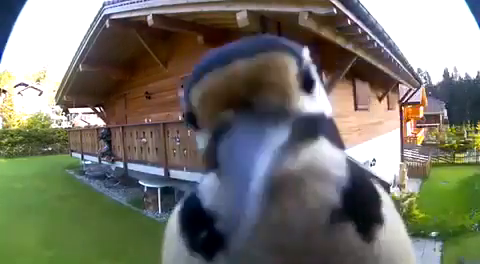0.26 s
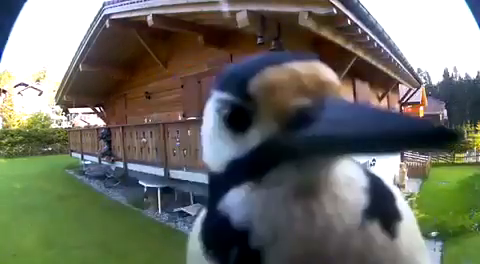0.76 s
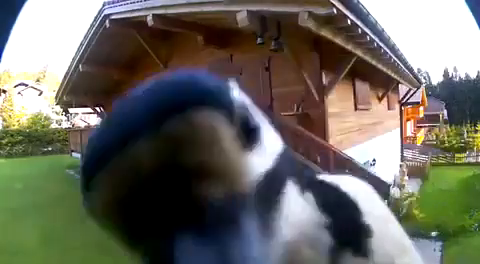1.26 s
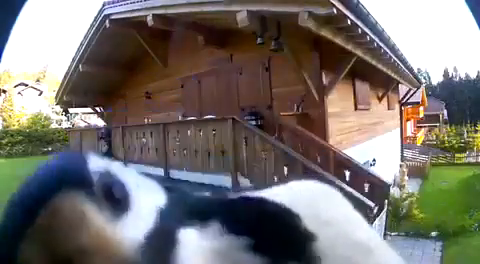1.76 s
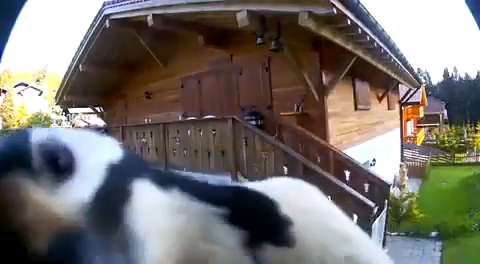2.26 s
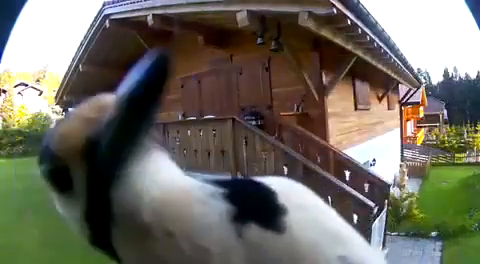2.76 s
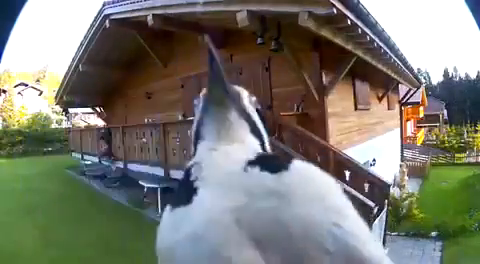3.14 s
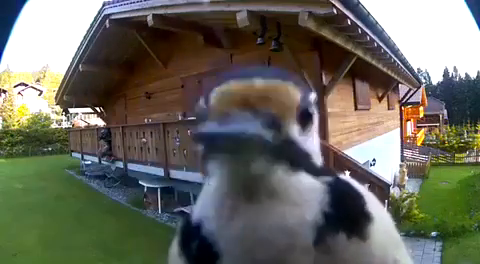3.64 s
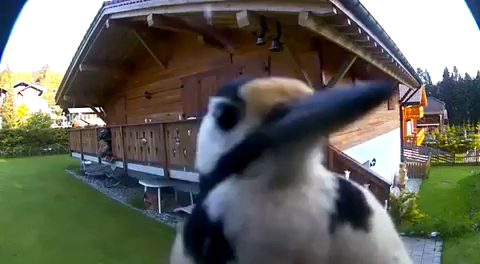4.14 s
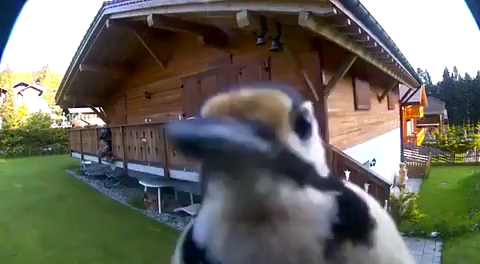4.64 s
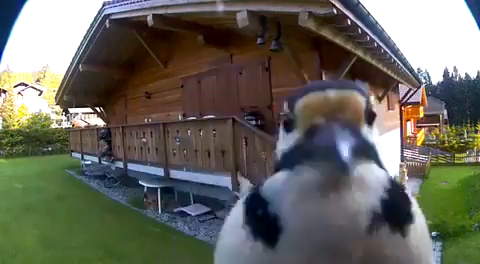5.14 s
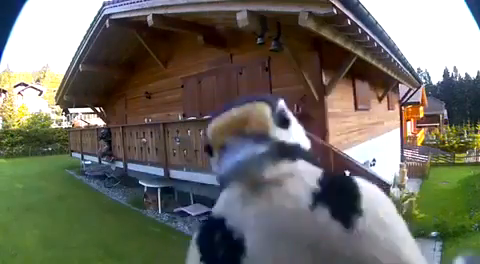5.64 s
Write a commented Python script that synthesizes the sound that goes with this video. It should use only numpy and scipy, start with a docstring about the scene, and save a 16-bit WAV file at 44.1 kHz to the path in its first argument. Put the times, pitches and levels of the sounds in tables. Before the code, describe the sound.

A woodpecker pecks on a small plastic camera with the microphone inside, over the faint low hush of a garden. Soft foot bumps and a light tap open the sound. Sharp, hard pecks land at about 0.5, 0.7 and 1.1 seconds, the third loudest, overloading the microphone and leaving a faint ring. From 1.4 to 2.5 seconds the bill taps lightly, scrapes and gives tiny squeaks. Far off, a small bird repeats a very faint rising note around 1.6 to 2 seconds, and a few thin whistles follow. Hard pecks return at 3.0 and 3.6 seconds, then faint dry ticks, two duller knocks at 4.6 and 4.9, and a soft foot bump. Three quick, heavy pecks come between 5.5 and 5.8 seconds. A very short buzz trails the blows near 0.5, 2.5, 3.1 and 5.8 seconds.

```python
"""A quiet garden, with the microphone inside a small camera on which a woodpecker hammers.
Small birds whistle far off over a low hush. Right at the microphone the bill taps, bounces, scrapes
and squeaks on the plastic housing, setting its modes ringing. Hard pecks come straight through the
shell and overload the input; after them the mount rings on faintly, and a short buzz may hang on."""
import sys
import numpy as np
from scipy import signal
from scipy.fft import rfft, irfft
from scipy.io import wavfile

SR = 44100
rng = np.random.default_rng(int(sys.argv[2]) if len(sys.argv) > 2 else 0)


def put_to_file(sound):
    """Save the sound as 16-bit audio at rate SR, in the file named by the first command-line argument."""
    columns = np.atleast_2d(sound).T  # one column per channel
    safe = np.clip(columns, -1, 1)
    whole_steps = np.round(safe * 32767)
    wavfile.write(sys.argv[1], SR, whole_steps.astype(np.int16))


N = 260190


def from_db(db):
    """Decibels to gain."""
    return 10 ** (np.asarray(db) / 20)


def seconds(length):
    """Time axis of a sound of this length."""
    return np.arange(int(length * SR)) / SR


def add(track, s, sound):
    """Mix a sound into the track at time s."""
    start = int(round(s * SR))
    track[start:start + len(sound)] += sound[:N - start]


def at_hz(points, hz):
    """Read a spectrum of (frequency [Hz], level [dB]) points on a log-frequency axis."""
    known_hz, db = np.transpose(points)
    return np.interp(np.log(np.maximum(hz, 1)), np.log(known_hz), db)


def noise(spectrum, size):
    """Noise with this spectrum; a flat 0 dB gives rms 1."""
    hz = np.fft.rfftfreq(size, 1 / SR)
    return irfft(rfft(rng.standard_normal(size)) * from_db(at_hz(spectrum, hz)), size)


def rms_one(x):
    """Scale to rms 1."""
    return x / np.sqrt(np.mean(x ** 2) + 1e-20)


def fade(t, t60):
    """Exponential decay, 60 dB down at t60."""
    return np.exp(-np.log(1000) * t / t60)


def mode(t, hz, t60):
    """A struck mode: a decaying sine."""
    return np.sin(2 * np.pi * hz * t) * fade(t, t60)


def whistle(pitch_hz):
    """A note that swells and fades as it follows a pitch curve."""
    return np.hanning(len(pitch_hz)) * np.sin(2 * np.pi * np.cumsum(pitch_hz) / SR)


def bursts(rows, fall_db, edge):
    """Envelope of soft-edged bursts (time [s], length [s], level [dB]), each sinking by fall_db."""
    envelope = np.zeros(N)
    for s, length, db in rows:
        size = int(length * SR)
        sinking = from_db(db - fall_db * np.linspace(-.5, .5, size))
        add(envelope, s, signal.windows.tukey(size, edge) * sinking)
    return envelope


# spectrum of the garden ambience: (frequency [Hz], relative level [dB])
HUSH_COLOUR = [(12, -45), (20, -7.5), (156, -3.5), (195, -13), (233, -7.5), (316, -15), (359, -27),
               (397, -14.5), (439, -28), (693, -21), (870, -29.5), (2590, -31.5), (3170, -32), (7300, -34),
               (8500, -45), (11000, -76), (18700, -120)]
# its level at the microphone: (time [s], level [dB])
HUSH_LEVEL = [(0, -55.5), (.9, -58), (3.3, -57.5), (4.2, -61), (5.1, -58.5), (5.9, -53.5)]

def garden_hush():
    """A low hush all around the microphone, drifting slowly in level."""
    level_db = np.interp(np.arange(N) / SR, *np.transpose(HUSH_LEVEL))
    return rms_one(noise(HUSH_COLOUR, size=N)) * from_db(level_db)


def twitter(count=170, db=-77.0, low_hz=2100, high_hz=4600):
    """The most distant birds blur into a faint haze of short sliding notes."""
    out, t = np.zeros(N), seconds(.05)
    for when, height, slide in rng.random((count, 3)):
        start_hz = low_hz * (high_hz / low_hz) ** height
        glide = 1 + 7 * (slide - .5) * t
        add(out, when * N / SR, from_db(db) * whistle(start_hz * glide))
    return out


# single whistles, far off: (time [s], length [s], start pitch [Hz], end pitch [Hz], level [dB])
FAR_WHISTLES = [(2.02, 0.06, 4500, 4840, -65.5), (2.844, .05, 3280, 3100, -69.5),
                (2.955, 0.039, 3030, 3290, -66.5), (3.229, 0.16, 2460, 1960, -68)]

def far_birds(count=5, song_start_s=1.60, step_s=.072, note_s=.042, rise_hz=(2960, 3450), note_db=-66):
    """Far from the microphone one bird repeats a rising note; a few single thin whistles follow."""
    out = np.zeros(N)
    song = [(song_start_s + k * step_s, note_s, *rise_hz, note_db) for k in range(count)]
    for s, length, start_hz, end_hz, db in song + FAR_WHISTLES:
        pitch = np.linspace(start_hz, end_hz, int(length * SR))
        add(out, s, from_db(db) * whistle(pitch))
    return out


# feet on the camera, close to the microphone: (time [s], length [s], level [dB])
FOOT_BUMPS = [(.055, 0.027, -52.5), (.14, 0.13, -56), (.325, 0.023, -42.5), (.590, 0.011, -46.5),
              (1.066, .010, -49), (3.27, 0.019, -60.5), (3.47, 0.044, -60.5), (4.999, 0.016, -41)]
# their dull spectrum: (frequency [Hz], relative level [dB])
FOOT_COLOUR = [(40, -9.5), (150, 10.5), (380, 10.5), (850, 5), (1500, -24.5), (7000, -26.5)]

def feet():
    """Soft bumps as the woodpecker shifts its feet."""
    return rms_one(noise(FOOT_COLOUR, size=N)) * bursts(FOOT_BUMPS, fall_db=11.0, edge=0.073)


# a short, close buzz after some blows: (time [s], level [dB])
BUZZES = [(.495, -39), (0.754, -59), (2.482, -43.5), (3.058, -44), (5.807, -41.5)]
# its spectrum: (frequency [Hz], relative level [dB])
BUZZ_COLOUR = [(300, -7), (900, -9), (1500, -4), (2300, 2), (3000, -4), (5500, -7), (8000, -11)]

def buzz(rate_hz=172, length_s=.074, hiss_gain=.7):
    """One rough grain repeats quickly, blurred by loose hiss."""
    grains = np.resize(noise(BUZZ_COLOUR, size=int(SR / rate_hz)), N)
    hiss = noise(BUZZ_COLOUR, size=N)
    rough = rms_one(rms_one(grains) + hiss_gain * rms_one(hiss))
    return rough * bursts([(s, length_s, db) for s, db in BUZZES], fall_db=14.5, edge=0.1)


# faint dry ticks, close by: (time [s], level before the band-pass [dB])
DRY_TICKS = [(0.632, -32), (3.779, -28), (3.869, -34), (4.373, -37.5), (4.666, -38.5), (4.727, -34.5),
             (5.001, -33.5), (5.773, -25.5)]

def ticks(band_hz=(1000, 3000)):
    """Bare clicks, too light to set the housing ringing."""
    clicks = np.zeros(N)
    for s, db in DRY_TICKS:
        add(clicks, s, from_db([db, db]))
    return signal.sosfilt(signal.butter(1, band_hz, "band", fs=SR, output="sos"), clicks + 1e-18)


# the bill tip squeaks on the shell: (time [s], length [s], pitch [Hz], rms level [dB])
BILL_SQUEAKS = [(1.414, 0.008, 2450, -33), (1.477, 0.01, 1784, -36.5), (1.483, .009, 3580, -41),
                (1.563, 0.016, 3515, -32.5), (1.561, 0.0105, 1670, -41.5), (2.325, 0.0063, 5660, -37),
                (2.333, 0.0062, 4320, -37), (2.405, .008, 5020, -29), (3.069, .011, 3500, -35)]

def squeaks():
    """Stick and slip of the sliding tip hold one shell mode in vibration for a moment."""
    out = np.zeros(N)
    for s, length, hz, db in BILL_SQUEAKS:
        tone = np.sqrt(2) * np.sin(2 * np.pi * hz * seconds(length))
        add(out, s, from_db(db) * tone * signal.windows.tukey(len(tone), .5))
    return out


BODY_TOP_HZ = 900   # body modes lie below, shell modes above
BANDS_HZ = (400, 1750, 2300, 5000)   # thud, knock, ring and snap of a blow
# modes of the housing around the microphone, and last the brief click of the bill tip:
# (frequency [Hz], relative level [dB], t60 [s])
HOUSING_MODES = [(178, -24, .12), (212.5, -17.5, 0.1), (308.5, -17.5, 0.066), (366.6, -0.5, 0.047),
                 (433, -11, 0.043), (802, -6, 0.024), (1135, -2.5, 0.0069), (1224, -7, 0.016),
                 (1752.4, -4, 0.026), (2107, 1.5, 0.0063), (2301, 0, 0.016), (2450, -9, .018),
                 (2794, -5.5, 0.0072), (3523, -2, 0.01), (4560, -9, 0.012), (4654, -8.5, .013),
                 (5783, -11, 0.013), (7650, -11, 0.0063), (5500, 3.5, 0.0041)]

def contact(levels_db, body_pitch, crack_db=-2.5, crack_t60=0.024, scatter_db=4, detune=.007):
    """The bill cracks on the housing and sets it ringing; where it lands decides the four band levels."""
    t = seconds(.2)
    colour = list(zip(BANDS_HZ, levels_db))
    blow = from_db(crack_db) * noise(colour, size=len(t)) * fade(t, crack_t60)
    for k, (hz, db, t60) in enumerate(HOUSING_MODES):
        strength = from_db(at_hz(colour, hz) + db + scatter_db * rng.standard_normal())
        # body modes all move inward with the blow and shift with its load; shell modes alternate in sign
        sign, pitch = (-1, hz * body_pitch) if hz < BODY_TOP_HZ else ((-1) ** k, hz)
        pitch *= 1 + detune * rng.standard_normal()   # the pressing bill shifts each mode
        blow += sign * strength * mode(t, pitch, t60)
    return blow


# light taps, right at the microphone: the bill chatters and slides along the shell
# (time [s], length [s], thud [dB], ring [dB], snap [dB], first-to-last swell [dB], scrape [dB])
LIGHT_TAPS = [(0.1778, 0.0052, -65, -57, -55, 0, -54), (0.1928, 0.014, -38, -35.5, -39, 22, -47.5),
              (0.329, .012, -49, -53.5, -56, -23.5, -74), (0.4757, 0.003, -22.5, -23.5, -45, -14, -43),
              (1.4097, 0.015, -59, -28.5, -40, 15, -50.5), (1.467, 0.018, -46.5, -44.5, -42, 10, -45.5),
              (1.544, .024, -45.5, -38, -43.5, 20.5, -43), (1.924, 0.04, -50.5, -50.5, -62.5, -6, -62.5),
              (1.996, 0.0089, -37.5, -46, -48, -1.5, -59), (2.269, .02, -59.5, -54.5, -53, -26, -72),
              (2.3219, 0.011, -54, -37, -38.5, 18, -50.5), (2.4019, 0.0075, -30.5, -25.5, -28, -12.5, -39),
              (2.4646, 0.015, -27, -19, -20.5, -2.5, -28)]

def taps(touches=3, brighten_db=5.5, knock_vs_ring_db=-4, body_pitch=.92):
    """Each tap is a run of touches that swells or dies, brightening as the bill lifts onto its tip."""
    out = np.zeros(N)
    for s, length, thud, ring, snap, swell_db, _ in LIGHT_TAPS:
        for along in np.linspace(0, 1, touches):
            tilt_db = brighten_db * (along - .5)
            touch = contact((thud - tilt_db, ring + knock_vs_ring_db, ring, snap + tilt_db), body_pitch)
            add(out, s + along * length, from_db(swell_db * (along - .5)) * touch)
    return out


def scrapes(slips_per_s=2500, hiss_gain=.3, lead_s=0.002, trail_s=.012):
    """From just before each tap to just after, dense tiny slips of the bill excite the shell modes."""
    slips = (rng.random(N) < slips_per_s / SR) * rng.standard_normal(N)
    t = seconds(.05)
    shell = sum((-1) ** k * from_db(db) * mode(t, hz, t60)
                for k, (hz, db, t60) in enumerate(HOUSING_MODES) if hz > BODY_TOP_HZ)
    rasp = rms_one(signal.fftconvolve(slips, shell)[:N]) + hiss_gain * rms_one(slips)
    slides = [(s - lead_s, lead_s + length + trail_s, db) for s, length, *_, db in LIGHT_TAPS]
    return rasp * bursts(slides, fall_db=7.5, edge=.3)


# long-ringing low, middle and top modes of the camera mount: (frequency [Hz], t60 [s])
MOUNT_MODES = [(705, .84), (818, .46), (3031, .56)]

def mount(levels_db):
    """The mount sings on like a faint tuning fork."""
    t = seconds(1)
    return sum(from_db(db) * mode(t, hz, t60) for db, (hz, t60) in zip(levels_db, MOUNT_MODES))


def shove(push, rise_s=0.0033, leak_hz=7.8):
    """The flexing shell squeezes the air inside; as it leaks away the microphone swings back."""
    t = seconds(.3)
    pulse = push * t / rise_s * np.exp(1 - t / rise_s)
    return signal.sosfilt(signal.butter(1, leak_hz, "high", fs=SR, output="sos"), pulse)


def lurch(db, hz=220, t60=0.029):
    """The camera rocks as the head pulls back: a dull, well damped swing of a few cycles."""
    return from_db(db) * mode(seconds(.1), hz, t60)


TIP_THUD_DB, TIP_KNOCK_DB = -12.5, -4   # the tip alone hardly moves the body of the camera
LANDING_DB, MOUNT_TOP_DB = -4, -69   # landing's ring and snap, and top mount mode, against the tip
REBOUND_S, REBOUND_THUD_DB = .0155, -2   # the first rebound after landing is lighter in the bass
BOUNCE_S, BOUNCE_DB = 0.0064, -14.5   # a second, weaker bounce follows
# hard pecks, reaching the microphone through the shell:
# (time [s], skid [s], thud [dB], knock [dB], ring [dB], snap [dB], body pitch [factor],
#  signed push [full scale], relative rebound [dB], lurch [dB], low mount [dB], middle mount [dB])
HARD_PECKS = [(0.4816, 0.0052, -6, 2, 11, 4, 0.93, -0.92, -29, -20, -59, -40.5),
              (0.7167, 0.0069, -3, -3, 6, -7, 0.94, -.3, -21, -24, -57, -48),
              (1.0981, .004, 3.5, 8, 13, 2.5, 0.77, 1.55, -22, -7.5, -36.5, -64),
              (3.0404, 0.0069, -5.5, -6.5, 1.5, -4, 0.98, 0.017, -19, -25.5, -59.5, -74),
              (3.599, 0.0011, 2.5, -1.5, -7.5, -7.5, 0.95, -1.15, -22, -26, -46, -67),
              (4.5897, 0.00086, -1.5, -3.5, -4, -16.5, 1.046, -0.078, -40, -27.5, -40.5, -66),
              (4.8509, 0.001014, 3.5, -6.5, -3.5, -10.5, 1.034, -0.03, -37, -29, -36, -60),
              (5.5042, 0.00095, 2, 0, 2, -5, 1, -0.27, -12, -15, -60.5, -61),
              (5.6569, .001, 6.5, 2, -3, -0.5, 1.007, 0.34, -33.5, -6.5, -52.5, -68),
              (5.7964, .001, 6, -2, -1, 2, 0.93, 0.19, -34, 0.5, -45.5, -76)]

def pecks(bounces=2):
    """The tip strikes and skids, the weight of the head lands, and the bill rebounds."""
    out = np.zeros(N)
    for (s, skid, thud, knock, ring, snap, pitch, push,
         rebound_db, lurch_db, mount_low, mount_middle) in HARD_PECKS:
        landing = s + skid
        rebound = landing + REBOUND_S
        add(out, s, contact((thud + TIP_THUD_DB, knock + TIP_KNOCK_DB, ring, snap), pitch))
        add(out, s, mount((mount_low, mount_middle, ring + MOUNT_TOP_DB)))
        add(out, landing, contact((thud, knock, ring + LANDING_DB, snap + LANDING_DB), pitch))
        add(out, landing, shove(push))
        add(out, rebound, lurch(lurch_db))
        for k in range(bounces):
            bounce = contact((thud + REBOUND_THUD_DB, knock, ring, snap), pitch)
            add(out, rebound + k * BOUNCE_S, from_db(rebound_db + k * BOUNCE_DB) * bounce)
    return out


def scene():
    """One microphone: the woodpecker right on its housing, the garden and small birds beyond."""
    background = garden_hush()
    shuffling = feet()
    bill = pecks() + taps() + scrapes() + squeaks() + ticks()
    return (background + twitter() + far_birds() + shuffling + buzz() + bill)[None]


def record(dry, overload=0.43, treble_hz=8076, cutoff_hz=8995):
    """The input clips flat; the narrow band of the recorder then rounds and ripples the edges."""
    clipped = np.clip(dry, -overload, overload)
    lowpass = signal.firwin(61, treble_hz, fs=SR)
    dull = signal.fftconvolve(clipped, lowpass[None], mode="same")
    return signal.sosfiltfilt(signal.butter(12, cutoff_hz, fs=SR, output="sos"), dull)


dry = scene()
out = record(dry)
put_to_file(out)
```